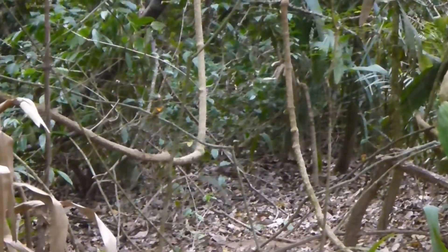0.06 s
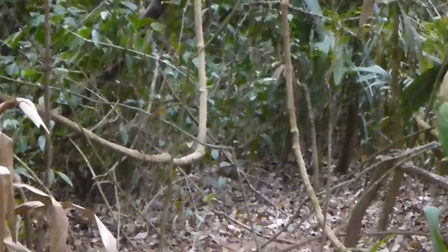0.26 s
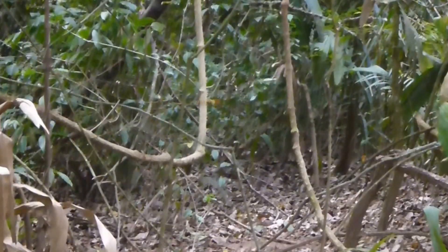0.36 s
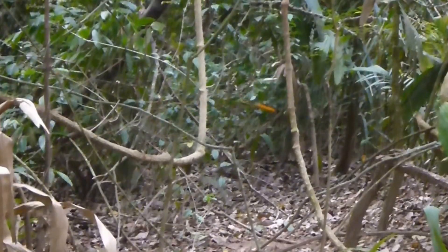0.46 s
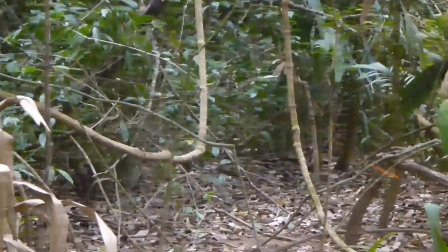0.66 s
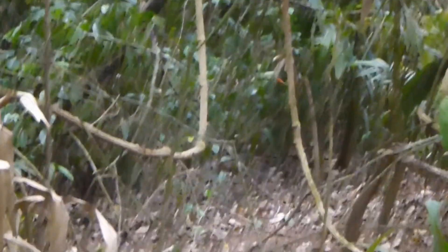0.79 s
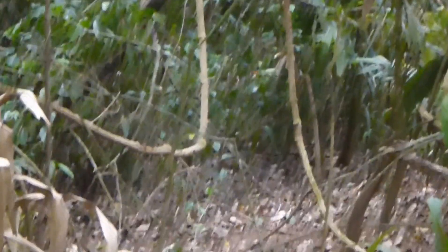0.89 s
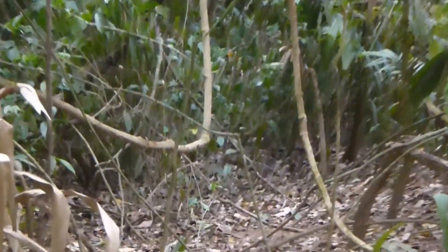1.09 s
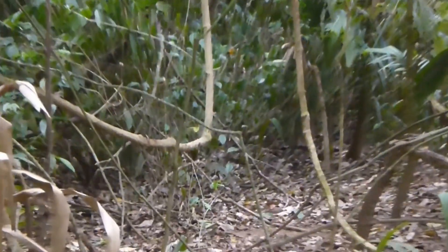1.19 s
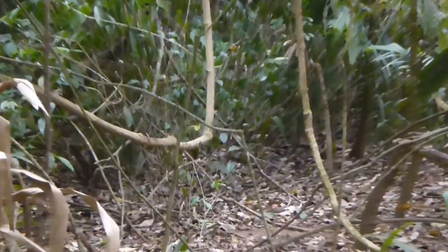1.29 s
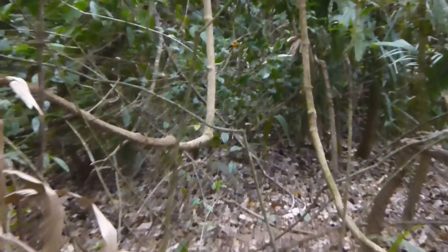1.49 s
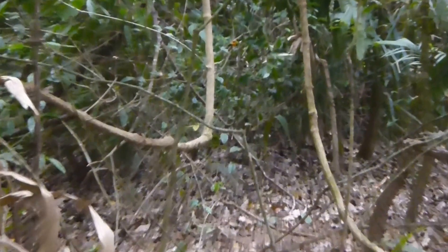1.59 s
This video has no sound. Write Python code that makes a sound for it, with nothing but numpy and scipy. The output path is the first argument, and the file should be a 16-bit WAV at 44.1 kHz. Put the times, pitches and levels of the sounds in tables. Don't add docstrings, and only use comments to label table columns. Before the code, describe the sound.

A small bird cracks its wings five times, each snap very short and bright with a leafy echo; one quick falling whistle follows the fourth, over soft insects, distant birds and forest hum, through one microphone.

```python
import sys
import numpy as np
from scipy import signal
from scipy.fft import rfft, irfft
from scipy.io import wavfile
from scipy.ndimage import uniform_filter1d

SR = 44100
rng = np.random.default_rng(int(sys.argv[2]) if len(sys.argv) > 2 else 0)


def gain_from_db(level_db):
    decades = np.asarray(level_db, float) / 20
    return 10 ** decades


def persist_wave(psi):
    counts = np.round(np.clip(psi, -1, 1) * 32767).astype(np.int16)
    wavfile.write(sys.argv[1], SR, np.atleast_2d(counts).T)


N = 72765

SNAP_TIMES = [
    .2385,
    .4142,
    .6328,
    .9157,
    .9182,
    1.2911,
]
# (crack level [dB], ring pitch [Hz], ring t60 [s], scatter level [dB])
SNAPS = [
    (-9, 4370, 0.0014, -35.5),
    (-12.5, 4150, 0.0032, -34.5),
    (-12.5, 4470, 0.002, -41),
    (-30, 2600, .003, -38.5),
    (-29.5, 4770, 0.018, -40.5),
    (-5.5, 4650, 0.0033, -36.5),
]
# (low pitch [Hz], level [dB], mid pitch [Hz], level [dB])
GROUND = [(1110, -21, 1810, -13), (1740, -9, 2370, -8), (1260, -10.5, 3240, -5), (1700, 3, 2000, 4),
          (2200, -2, 3300, -3), (1620, -17.5, 3320, -7.5)]
# (time [s], level [dB], pitch [Hz])
TRUNKS = [(.4170, -21, 4700), (.4190, -22, 4900), (.2425, -28, 4700), (.6347, -26, 3300),
          (1.2972, -30, 5100)]
# (frequency [Hz], level per Hz [dB])
SCATTER_COLOUR = [(900, -27), (1600, -5), (2200, 0.5), (3200, 1), (4800, 5), (8000, -34.5), (12000, -5),
                  (16000, -40)]
# (frequency [Hz], t60 [s])
SCATTER_T60 = [(1000, 0.11), (3000, 0.36), (5000, 0.5), (9000, 0.24), (14000, 0.26)]
# (time [s], pitch [Hz], level [dB])
WHISTLE = [(.985, 2950, -60), (1.0, 3500, -58), (1.011, 4130, -43), (1.027, 4385, -48), (1.044, 4330, -45),
           (1.068, 3600, -44), (1.098, 3080, -45), (1.128, 2790, -44), (1.172, 2420, -52)]
# (time [s], pitch [Hz], level [dB])
HELD_NOTE = [(1.035, 4370, -62), (1.05, 4360, -46), (1.085, 4365, -45), (1.105, 4350, -53),
             (1.15, 4350, -55), (1.24, 4350, -66)]
# (time [s], pitch [Hz], level [dB])
THIN_NOTE = [(.94, 4900, -54), (.96, 4880, -49), (.982, 4830, -46), (1.0, 4800, -51), (1.015, 4770, -62)]
WHISTLE_PARTIALS = [0, -14, -17, -22]
HELD_PARTIALS = [0, -24, -27, -40]
# (frequency [Hz], level [dB])
THROAT = [(2500, 0), (6200, 2), (7800, -3), (8750, 0), (9300, -14), (11500, -12), (13000, 3), (15500, -1)]
# (time [s], length [s], start pitch [Hz], end pitch [Hz], level [dB])
PIPES = [
    (1.405, .062, 1320, 1332, -55),
    (1.503, .075, 1430, 1478, -50),
    (1.405, .018, 2030, 2030, -58),
]
# (time [s], peak level [dB], pitch [Hz])
FAR_SNAPS = [(0.054, -42.5, 3130), (.088, -40.5, 2580), (0.125, -38.5, 2630), (.170, -39.5, 2650),
             (.380, -38, 3080), (.523, -36.5, 3100), (0.547, -39, 2620), (.591, -52, 2200),
             (0.608, -45, 2600), (.7395, -40, 2650), (0.7548, -34, 2840), (.7700, -37.5, 2610),
             (.7865, -45, 2650), (.8020, -42, 2570), (0.816, -30.5, 2750), (0.886, -43, 3050),
             (1.475, -48, 2600)]
# (time [s], peak level [dB])
TWIGS = [(1.146, -31), (1.565, -35), (1.5800, -26)]
# (frequency [Hz], level per Hz [dB])
HUM = [(30, -31), (60, -21.5), (125, -3), (200, -3), (400, -5.5), (800, -9), (1500, -15), (2300, -10.5)]
# (frequency [Hz], level per Hz [dB])
AIR = [(2300, -14), (3500, -19.5), (5000, -22), (6500, -30), (9000, -30.5), (12500, -36.5), (15500, -39)]
# (time [s], level [dB])
FOREST_SWELL = [(0, -46), (.5, -45), (1.0, -45), (1.3, -47.5), (1.65, -46.5)]
# (centre [Hz], width [Hz], level [dB], throb rate [1/s])
INSECTS = [(3080, 340, -55.5, 75), (2650, 360, -67.5, 6.7), (5020, 130, -66, 90)]
# (centre [Hz], width [Hz])
NOTCHES = [(2890, 170), (7846, 70), (11740, 700)]

GROUND_LAG_S, GROUND_T60_S, LOW_CUT_HZ = .0004, .009, 780
EDGE_HZ, EDGE_T60_S, EDGE_DB = 9500, .0012, -17
AIRY_HZ, AIRY_T60_S, AIRY_DB = 13000, .0044, -34
STEMS_PER_S, STEM_DB, STEM_T60_S, STEM_SPREAD_DB = 2900, -19.5, .031, 4
STEM_RING_HZ, STEM_RING_T60_S = 5460, .0034
SCATTER_RISE_S, TRUNK_T60_S = .001, .005
WOBBLE_DB, WOBBLE_PITCH = 2.5, .004
RASP, RASP_PER_S = .4, 700
CALL_ECHO_DB, CALL_T60_S = -1, .28
FAR_T60_S, FAR_DB, FAR_ECHO_S, FAR_ECHO_DB = .016, 4.5, .0026, -13
TWIG_T60_S, TWIG_DB = .03, -8
RUSTLE_S, RUSTLE_LENGTH_S, RUSTLE_DB = .185, .12, -58
PATCHY_DB, THROB_DB = .7, 2.5
TICK_S, TICKS_PER_S, TICK_HZ, TICK_T60_S, TICK_DB = .0022, 29.97, 12500, .008, -88
TOP_HZ, TOP_LEAK_DB = 15750, -12


def rms_one(x):
    return x / np.sqrt(np.mean(x ** 2) + 1e-20)


def at_hz(points, hz):
    table_hz, values = np.transpose(points)
    return np.interp(np.log(hz), np.log(table_hz), values)


def drift(rate):
    r = np.exp(-2 * np.pi * rate / SR)
    noise = rng.standard_normal(N + SR)
    return rms_one(signal.lfilter([1], [1, -2 * r, r * r], noise)[SR:])


def ring(clicks, hz, t60):
    r = gain_from_db(-60 / (t60 * SR))
    w = 2 * np.pi * hz / SR
    return signal.lfilter([0, np.sin(w)], [1, -2 * r * np.cos(w), r * r], clicks + 1e-18)


def bands(length, low_hz):
    edges = low_hz * 2 ** np.arange(0, np.log2(16500 / low_hz) + .5, .5)
    edges = np.minimum(edges, .45 * SR)
    white = rng.standard_normal((2, length + 4000))
    split = []
    for k, (a, b) in enumerate(zip(edges, edges[1:])):
        sos = signal.butter(2, [a, b], "band", fs=SR, output="sos")
        split.append((np.sqrt(a * b), signal.sosfilt(sos, white[k % 2])[-length:]))
    return split


def add(out, s, sound):
    i = int(s * SR)
    out[i:i + len(sound)] += sound[:N - i]


def wing_crack(t, db, hz, t60, low_hz, low_db, mid_hz, mid_db):
    chance = rng.random((4, len(t)))
    size = gain_from_db(STEM_DB - 60 * t / STEM_T60_S - STEM_SPREAD_DB * np.log(chance[1] + .05))
    hit = chance[0] < STEMS_PER_S / SR
    echoes = size * hit * np.sign(chance[2] - .5) * (t > .001)
    kind = (chance[3] * 4).astype(int)
    click = 1. * (t == 0)
    late = np.roll(click, int(GROUND_LAG_S * SR))
    wing = ring(click + echoes * (kind == 0), hz, t60)
    stems = ring(echoes * (kind == 1), STEM_RING_HZ, STEM_RING_T60_S)
    low = gain_from_db(low_db) * ring(click + 2 * echoes * (kind == 2), low_hz, GROUND_T60_S)
    mid = gain_from_db(mid_db) * ring(late + 2 * echoes * (kind == 3), mid_hz, GROUND_T60_S)
    edge = gain_from_db(EDGE_DB) * ring(click + echoes * (kind < 2), EDGE_HZ, EDGE_T60_S)
    airy = gain_from_db(AIRY_DB) * ring(click, AIRY_HZ, AIRY_T60_S)
    return gain_from_db(db) * (wing + stems + low + mid - edge + airy)


def foliage_scatter(t, db):
    level, tail = 0, 0
    for hz, noise in bands(len(t), low_hz=760):
        colour_db = at_hz(SCATTER_COLOUR, hz)
        level = level + gain_from_db(colour_db) * noise
        tail = tail + gain_from_db(colour_db - 60 * t / at_hz(SCATTER_T60, hz)) * noise
    return gain_from_db(db) * tail / np.std(level) * (1 - np.exp(-t / SCATTER_RISE_S))


def snaps():
    out, t = np.zeros(N), np.arange(SR // 2) / SR
    for s, (db, hz, t60, scatter_db), ground in zip(SNAP_TIMES, SNAPS, GROUND):
        crack = wing_crack(t, db, hz, t60, *ground)
        add(out, s, foliage_scatter(t, scatter_db) - crack)
    for s, db, hz in TRUNKS:
        add(out, s, gain_from_db(db) * ring(1. * (t == 0), hz, TRUNK_T60_S))
    return signal.sosfilt(signal.butter(3, LOW_CUT_HZ, "high", fs=SR, output="sos"), out + 1e-18)


def voice(rows, partials_db):
    s, hz, db = np.transpose(rows)
    t = np.arange(N) / SR
    hz = uniform_filter1d(np.interp(t, s, hz), size=200) * (1 + WOBBLE_PITCH * drift(106))
    phase = 2 * np.pi * np.cumsum(hz) / SR
    tone = np.zeros(N)
    for k, partial_db in enumerate(partials_db):
        level = gain_from_db(partial_db + at_hz(THROAT, (k + 1) * hz) + WOBBLE_DB * drift(71))
        rasp = 1 + k ** .5 * RASP * drift(RASP_PER_S)
        tone += level * rasp * np.sin((k + 1) * phase)
    return tone * gain_from_db(np.interp(t, s, db)) * (t > s[0]) * (t < s[-1])


def whistles():
    call = voice(WHISTLE, WHISTLE_PARTIALS) + voice(HELD_NOTE, HELD_PARTIALS) + voice(THIN_NOTE, HELD_PARTIALS)
    t = np.arange(SR // 2) / SR
    trees = rng.standard_normal(len(t)) * gain_from_db(-60 * t / CALL_T60_S) * (t > .004)
    trees /= np.sqrt(np.sum(trees ** 2))
    return call + gain_from_db(CALL_ECHO_DB) * signal.fftconvolve(call, trees)[:N]


def far_birds():
    out = np.zeros(N)
    for s, length, start_hz, end_hz, db in PIPES:
        hz = np.linspace(start_hz, end_hz, int(length * SR))
        tone = np.sin(2 * np.pi * np.cumsum(hz) / SR)
        add(out, s, gain_from_db(db + 3) * tone * signal.windows.tukey(len(hz), .25))
    for s, db, hz in FAR_SNAPS:
        clicks = np.zeros(SR // 10)
        clicks[:40] = np.hanning(40) * np.sin(2 * np.pi * hz * np.arange(40) / SR) / 10
        lag = int(FAR_ECHO_S * SR * rng.uniform(.587, 1.3))
        clicks += gain_from_db(FAR_ECHO_DB) * np.roll(clicks, lag)
        snap = .7 * ring(clicks, hz, FAR_T60_S) + .4 * ring(clicks, 1.2 * hz, FAR_T60_S)
        add(out, s, gain_from_db(db + FAR_DB) * snap)
    return out


def litter():
    out, t = np.zeros(N), np.arange(SR // 10) / SR
    sos = signal.butter(4, [700, 5000], "band", fs=SR, output="sos")
    for s, db in TWIGS:
        tick = signal.sosfilt(sos, rng.standard_normal(len(t)))
        add(out, s, gain_from_db(db + TWIG_DB - 60 * t / TWIG_T60_S) * tick)
    sos = signal.butter(2, [3300, 6000], "band", fs=SR, output="sos")
    rustle = rms_one(signal.sosfilt(sos, rng.standard_normal(len(t))))
    add(out, RUSTLE_S, gain_from_db(RUSTLE_DB) * rustle * (t < RUSTLE_LENGTH_S))
    return out


def forest():
    colour = HUM + AIR[1:]
    bed = np.zeros(N)
    for hz, noise in bands(N, low_hz=24):
        bed += gain_from_db(at_hz(colour, hz) + PATCHY_DB * drift(8)) * noise
    out = rms_one(bed) * gain_from_db(np.interp(np.arange(N) / SR, *np.transpose(FOREST_SWELL)))
    for hz, width, db, rate in INSECTS:
        once = ring(rng.standard_normal(N), hz, 1.2 / width)
        shimmer = rms_one(ring(once, hz, 1.2 / width))
        out += gain_from_db(db + THROB_DB * drift(rate)) * shimmer
    return out


def camera():
    since = (np.arange(N) / SR - TICK_S) % (1 / TICKS_PER_S)
    puff = np.sin(2 * np.pi * TICK_HZ * since) + 1.3 * rng.standard_normal(N)
    return gain_from_db(TICK_DB) * ring((since < .003) * puff, TICK_HZ, TICK_T60_S)


def scene():
    return (snaps() + whistles() + far_birds() + litter() + forest() + camera())[None]


def roll_off(x):
    return signal.sosfilt(signal.butter(12, 16680, fs=SR, output="sos"), x)


def record(dry):
    x = dry
    for hz, width in NOTCHES:
        x = signal.lfilter(*signal.iirnotch(hz, hz / width, SR), x)
    f = np.fft.rfftfreq(N, 1 / SR)
    mix = irfft(rfft(x) * np.where(f < TOP_HZ, 1, gain_from_db(TOP_LEAK_DB)), N)
    return roll_off(mix)


dry = scene()
out = record(dry)
persist_wave(out)
```